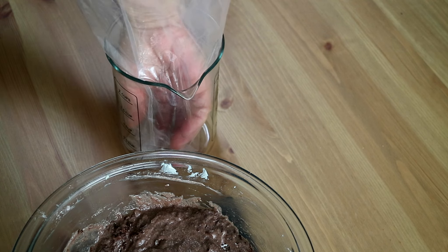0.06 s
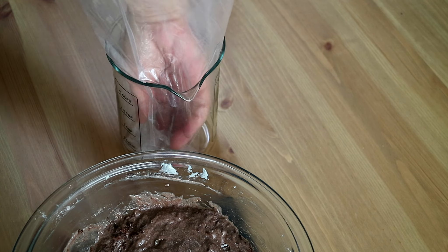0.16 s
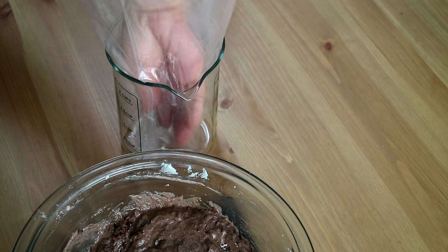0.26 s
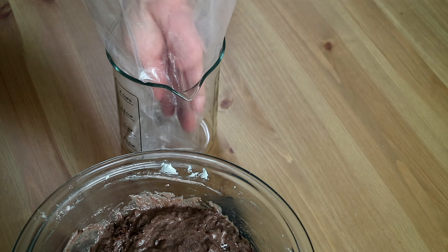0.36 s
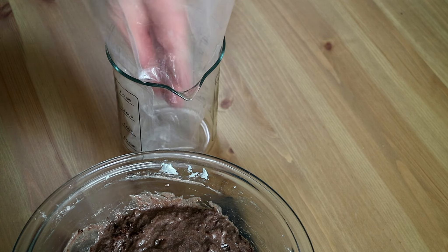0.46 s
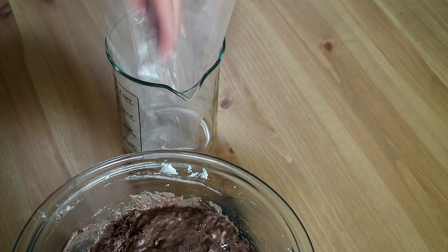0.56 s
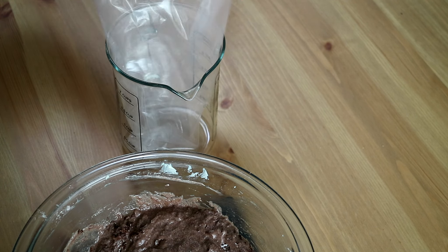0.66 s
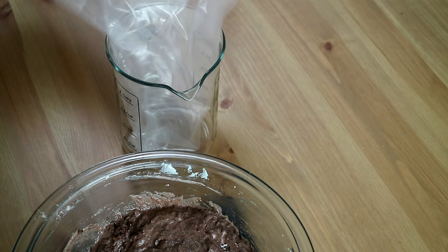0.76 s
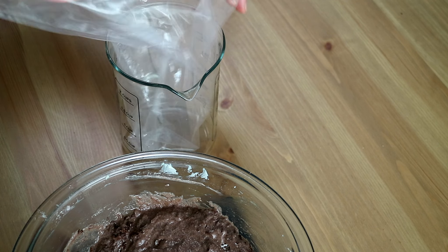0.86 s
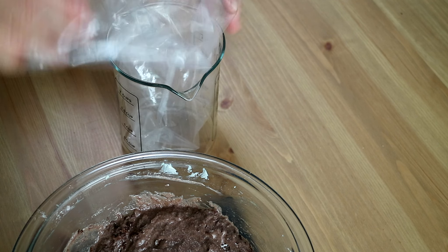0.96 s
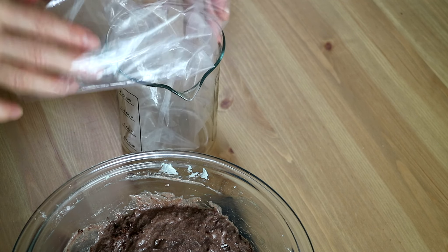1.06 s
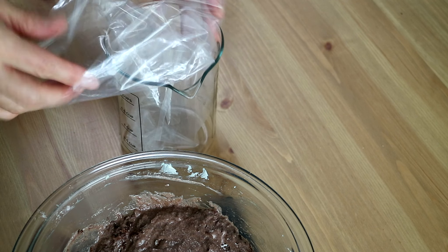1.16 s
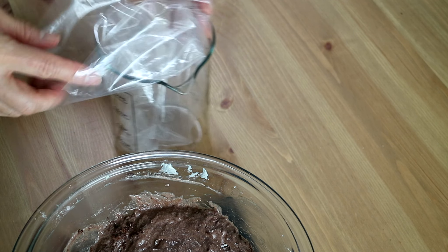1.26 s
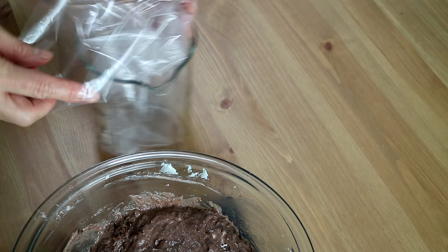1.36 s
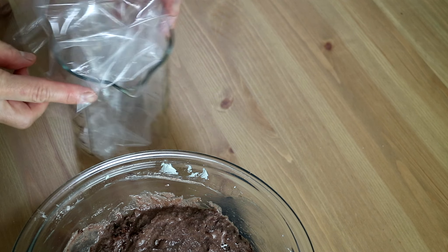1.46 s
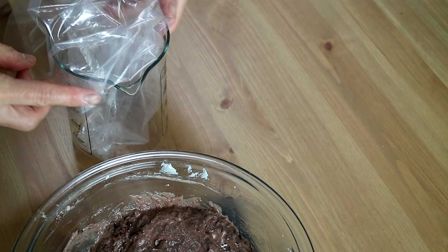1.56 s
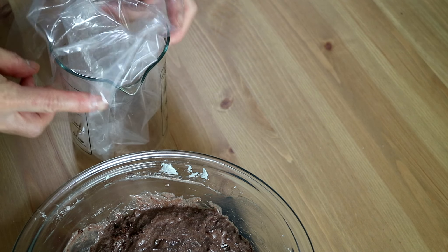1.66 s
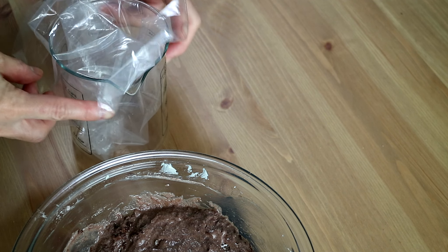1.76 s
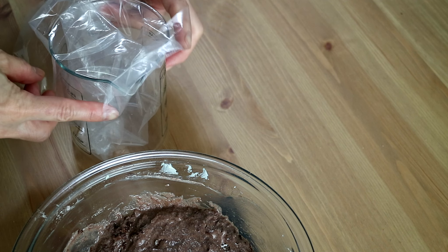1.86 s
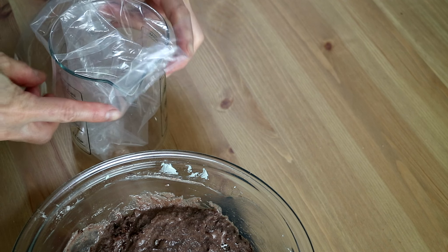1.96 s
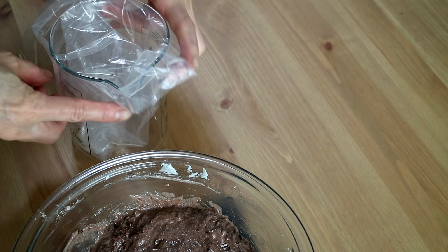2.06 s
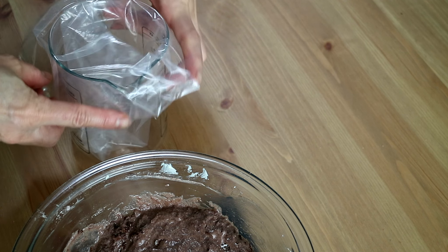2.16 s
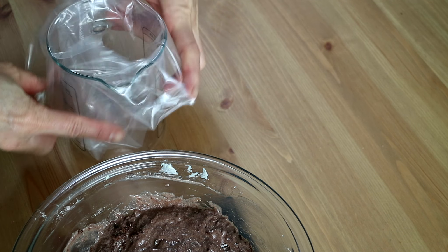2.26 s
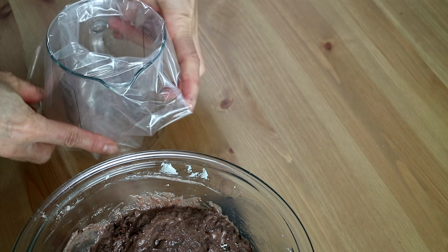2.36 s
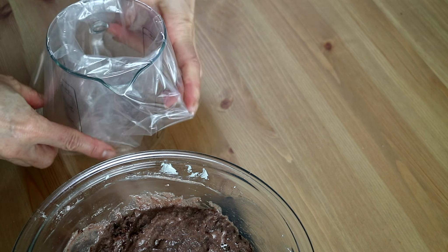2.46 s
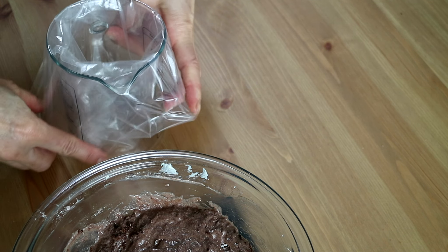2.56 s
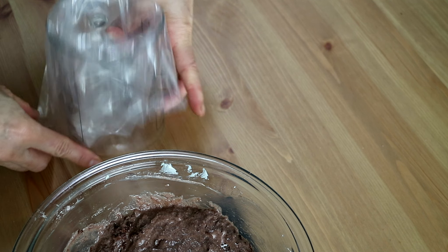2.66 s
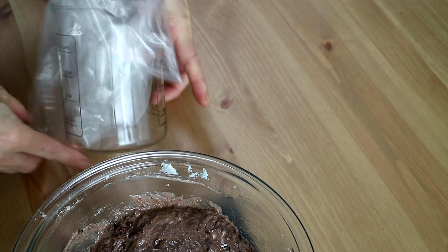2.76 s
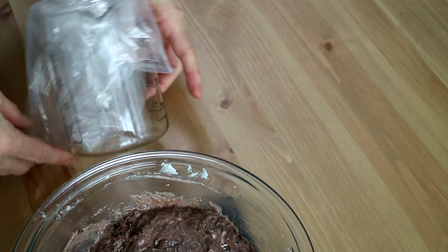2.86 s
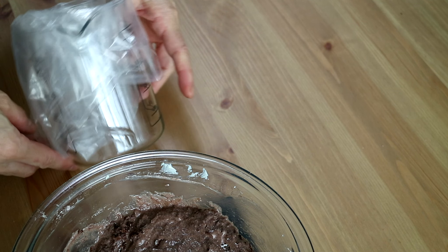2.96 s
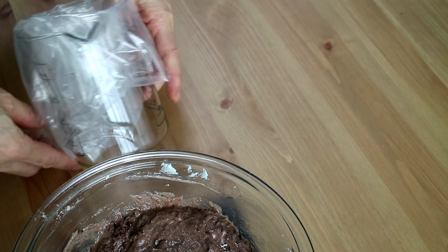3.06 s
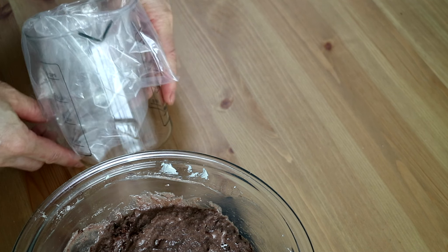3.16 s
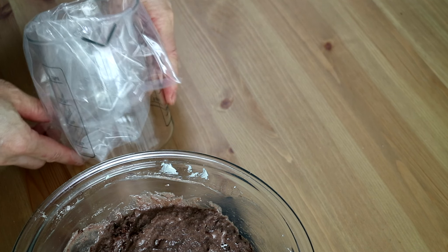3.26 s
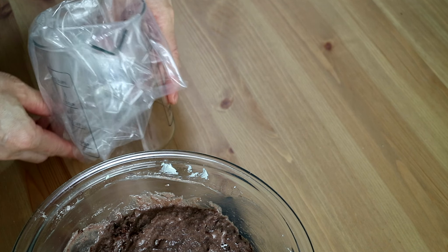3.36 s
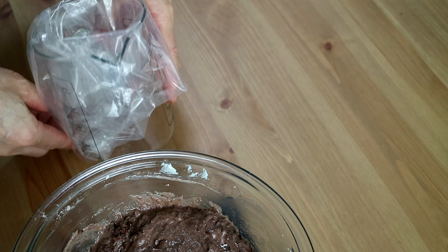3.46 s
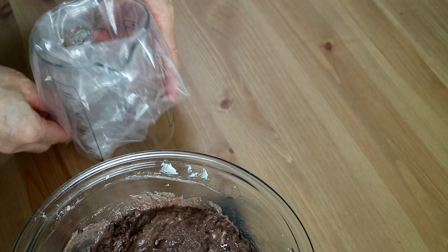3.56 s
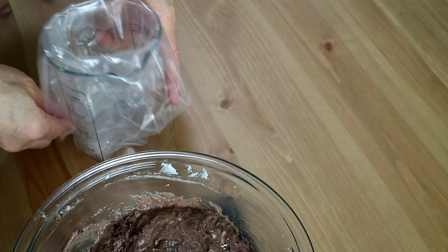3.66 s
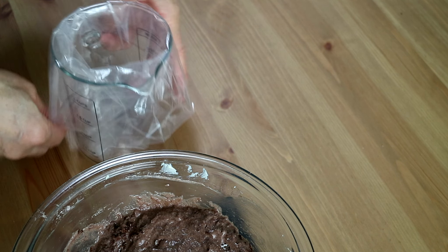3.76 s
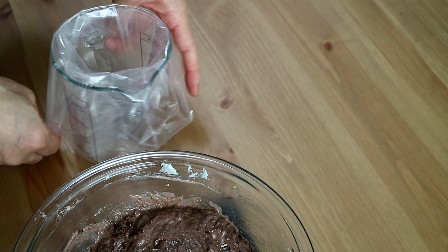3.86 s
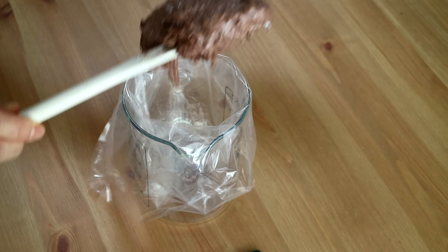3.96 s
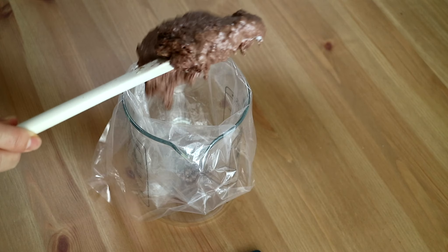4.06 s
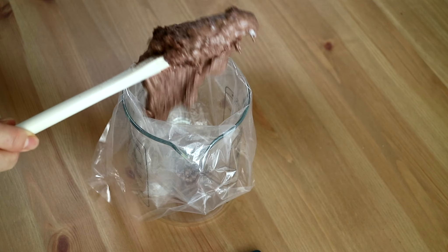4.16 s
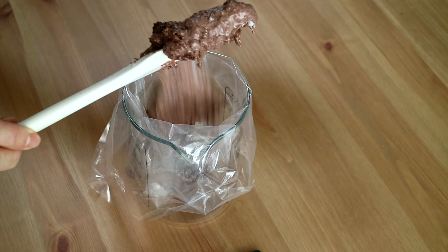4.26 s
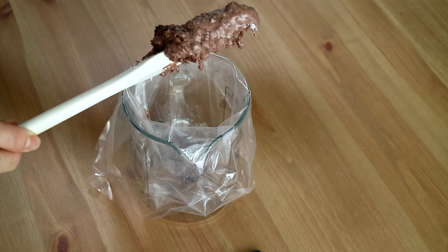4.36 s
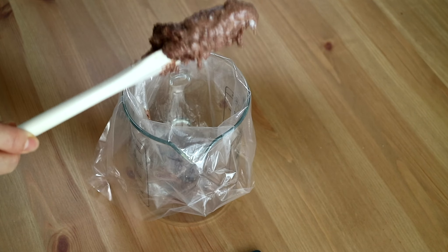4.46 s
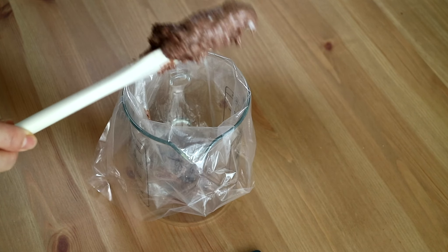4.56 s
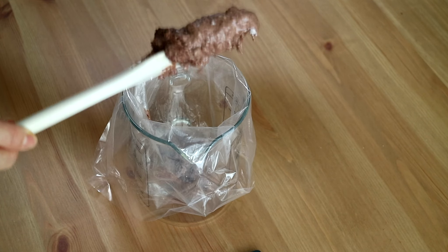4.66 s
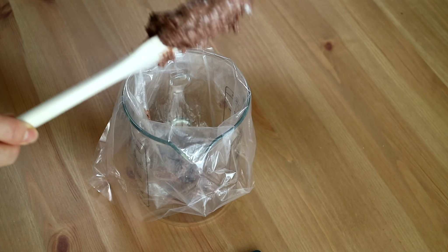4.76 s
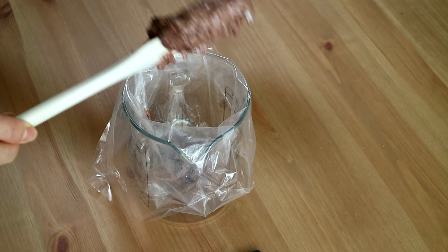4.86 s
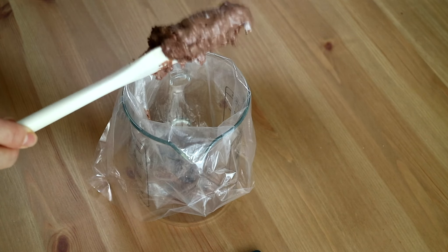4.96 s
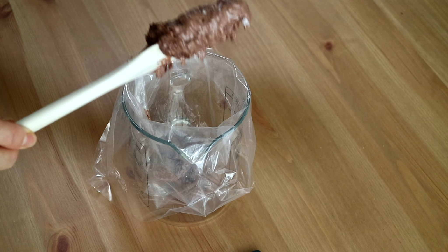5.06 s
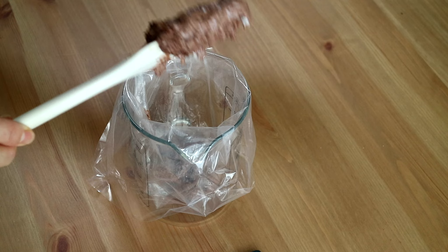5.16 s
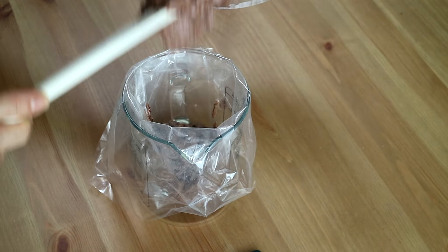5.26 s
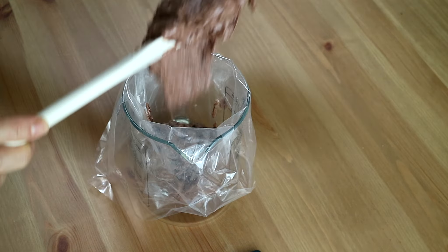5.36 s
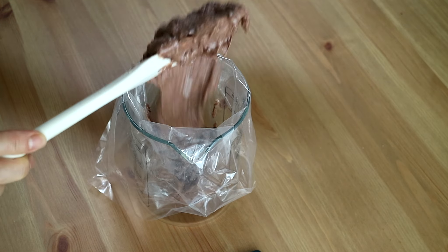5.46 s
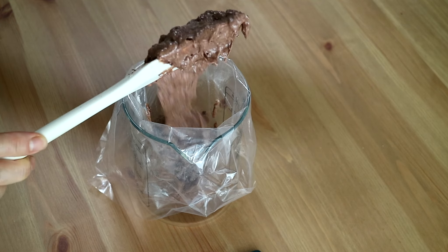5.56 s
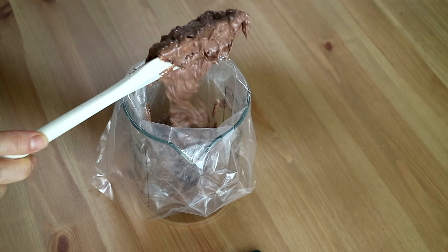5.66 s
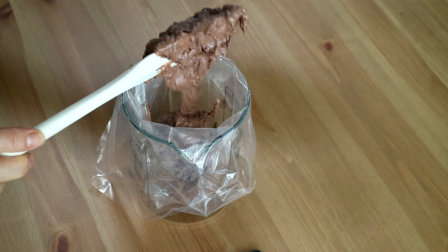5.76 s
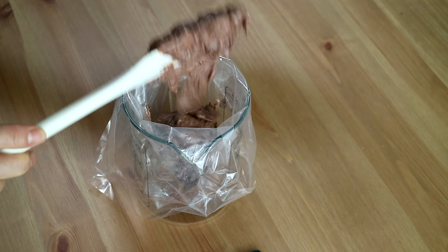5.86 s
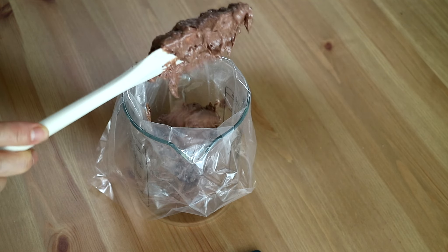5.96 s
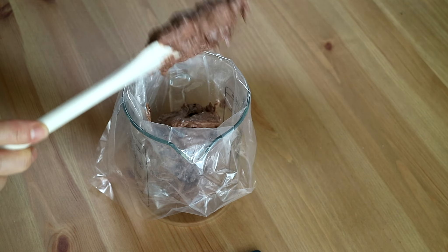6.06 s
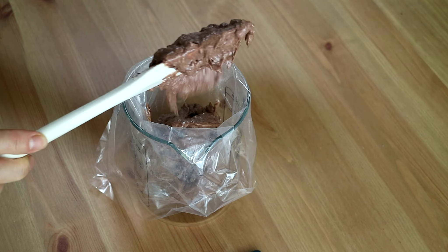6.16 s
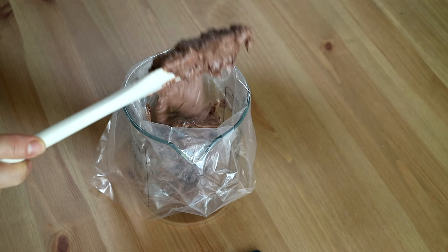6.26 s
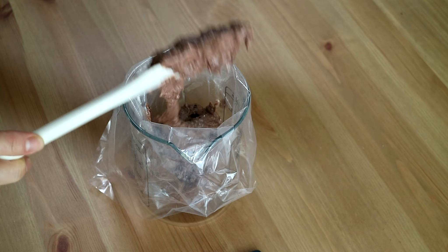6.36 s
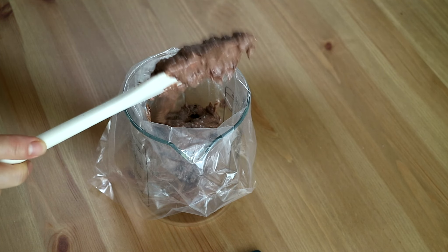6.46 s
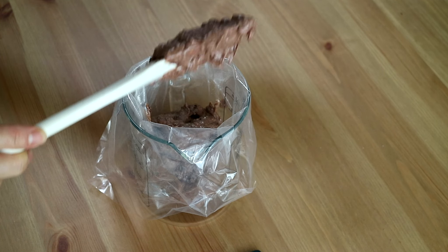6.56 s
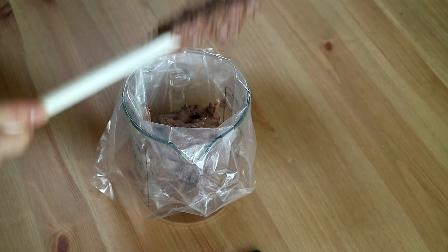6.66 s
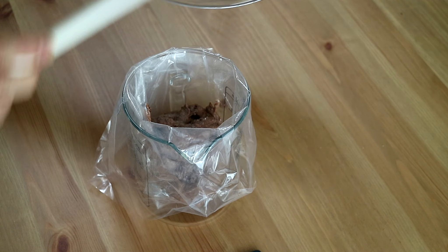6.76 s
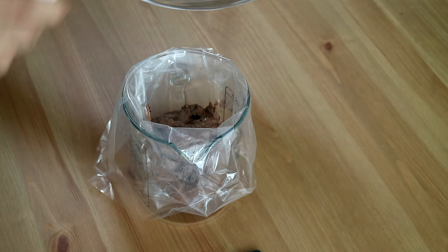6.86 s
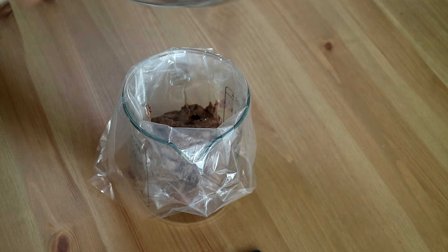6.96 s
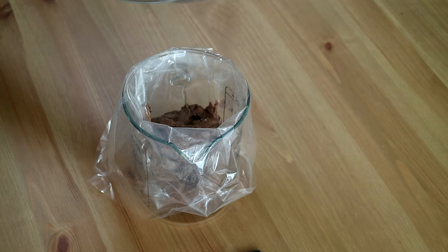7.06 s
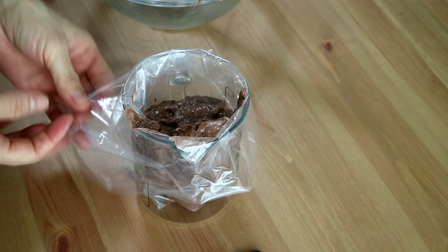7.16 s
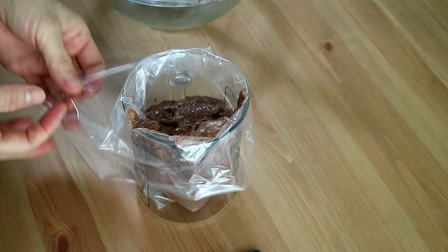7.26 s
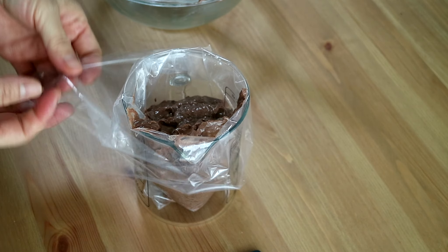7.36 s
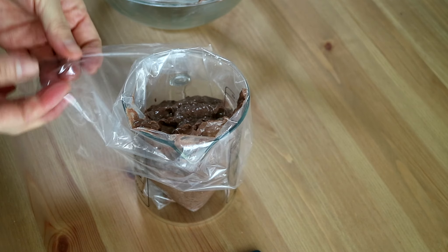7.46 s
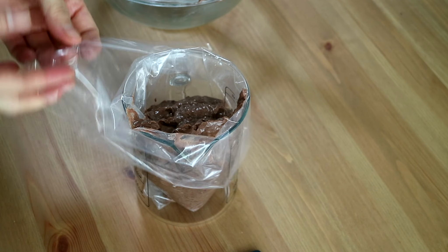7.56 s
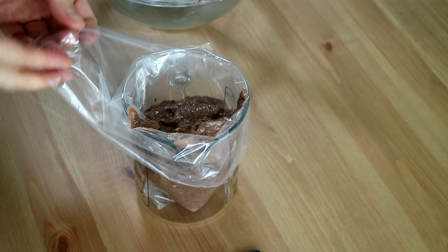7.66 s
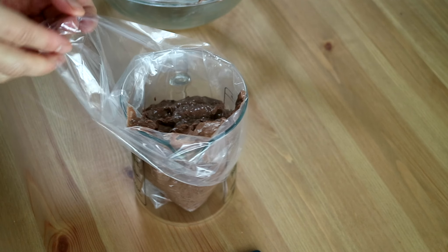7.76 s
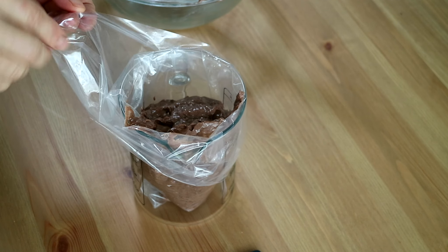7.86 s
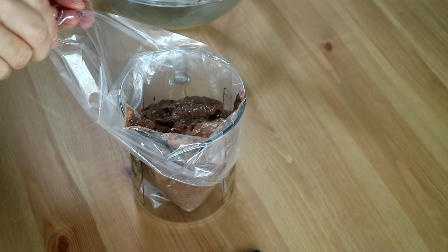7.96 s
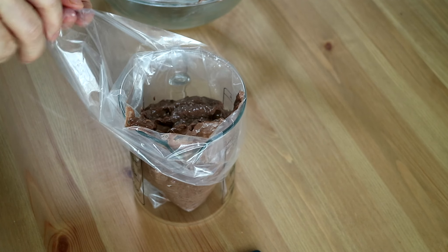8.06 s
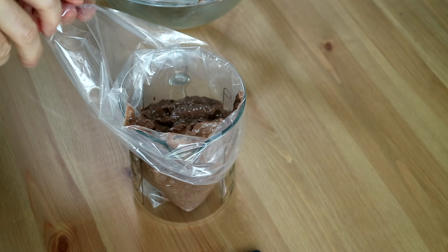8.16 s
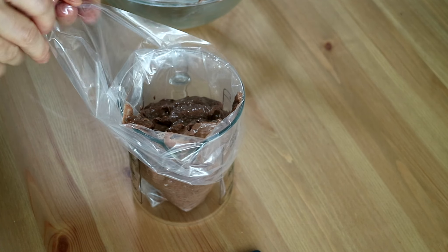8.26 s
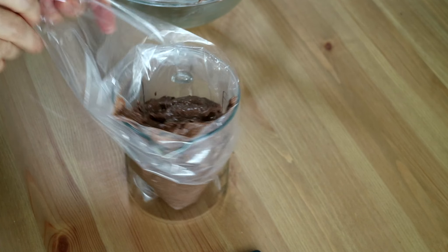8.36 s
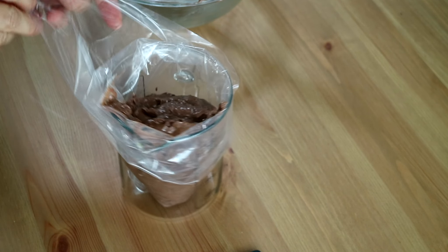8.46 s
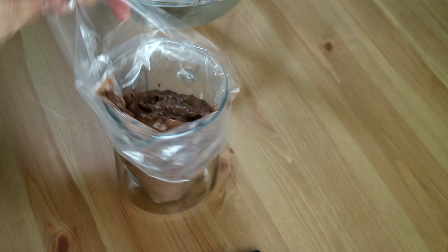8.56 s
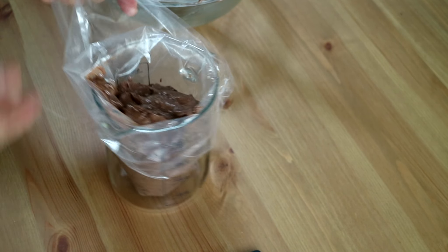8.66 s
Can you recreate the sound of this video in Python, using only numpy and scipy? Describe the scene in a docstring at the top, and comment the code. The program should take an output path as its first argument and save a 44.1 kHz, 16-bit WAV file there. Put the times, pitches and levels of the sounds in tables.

```python
"""In a kitchen, a thin plastic piping bag is pushed into a glass jug on a wooden table, folded over the rim,
filled with batter and lifted out. Creases in the film snap and crackle: short clicks of many colours.
Pushes make the air in the jug boom, a fading tone; the jug drags on the wood, slips ringing the table top.
There are light taps on the glass and one harder knock. One close pick-up hears the work and its echoes, the
same on both sides; faint, mostly unrelated hiss lies left and right, with a low hum and one thin whistle."""
import sys
import numpy as np
from scipy import signal
from scipy.fft import rfft, irfft
from scipy.io import wavfile

SR = 44100
rng = np.random.default_rng(int(sys.argv[2]) if len(sys.argv) > 2 else 0)


def master_out(mix):
    """Clip the mix to full scale and print it as 16-bit PCM to the path in sys.argv[1]."""
    frames = np.transpose(np.atleast_2d(mix))
    ceiling = np.clip(frames, -1, 1)
    pcm = np.round(ceiling * 32767).astype(np.int16)
    wavfile.write(sys.argv[1], SR, pcm)


N = 384111

BREAK_S = 3.968   # drags and echoes from before this moment are silenced at once here
FILLED_S = 5.3   # from here the batter deadens the air and weighs the jug down


def from_db(db):
    """Decibels to gain."""
    return 10 ** (np.asarray(db) / 20)


def rms_one(x):
    """Scale to an average strength (rms) of 1."""
    return x / np.sqrt(np.mean(x ** 2) + 1e-20)


def in_time(rows):
    """Join the points of a table with straight lines: each column gets one value a sample."""
    s, *columns = np.transpose(rows)
    return [np.interp(np.arange(N) / SR, s, column) for column in columns]


def at_hz(points, hz):
    """Read a (pitch, value) table at any pitch, on a log-frequency axis."""
    table_hz, values = np.transpose(points)
    return np.interp(np.log(hz), np.log(table_hz), values)


def drift(rate_hz):
    """Smooth random wandering with spread 1, worked out at every 40th sample and joined up."""
    r = np.exp(-80 * np.pi * rate_hz / SR)
    noise = rng.standard_normal(N // 40 + 2002)
    slow = signal.lfilter([1], [1, -2 * r, r * r], noise)[2000:]
    return np.interp(np.arange(N) / 40, np.arange(len(slow)), rms_one(slow))


def resonance(x, hz, width_hz):
    """Ring at one pitch: a two-pole filter with a peak of gain 1; a narrower peak rings longer."""
    r = np.exp(-np.pi * width_hz / SR)
    top = [(1 - r * r) / 2, 0, (r * r - 1) / 2]
    return signal.lfilter(top, [1, -2 * r * np.cos(2 * np.pi * hz / SR), r * r], x + 1e-18)


def grains(per_s, spread_db, clump_db, clump_rate_hz):
    """Random clicks of random sign, a few much larger, coming in clumps."""
    sizes = from_db(spread_db * np.minimum(rng.exponential(1, N), 4)) * rng.choice([-1, 1], N)
    chance = per_s * from_db(clump_db * drift(clump_rate_hz)) / SR
    return sizes * (rng.random(N) < chance)


def add(out, s, sound):
    """Mix a short sound in at a time in seconds."""
    i = round(s * SR)
    out[i:i + len(sound)] += sound[:N - i]


# colour of the hiss: (pitch [Hz], gain [dB])
HISS_COLOUR = [(18, -17), (30, -9.5), (71, -7.5), (100, -4.5), (285, -4), (371, -2), (594, -3), (2040, -10),
               (12700, -12), (15700, -17)]
# how alike the room noise is left and right: (pitch [Hz], likeness [-1 to 1])
LEFT_RIGHT_LIKENESS = [(40, 1), (130, 0.015), (500, -0.39), (1800, 0.13)]


def hiss():
    """Noise shaped by pitch; the balance of sum and difference sets how alike left and right are."""
    hz = np.maximum(np.arange(N // 2 + 1) * SR / N, 1)
    alike = np.clip(at_hz(LEFT_RIGHT_LIKENESS, hz), -1, 1)
    balance = np.sqrt([1 + alike, 1 - alike])
    spectrum = rfft(rng.standard_normal((2, N))) * from_db(at_hz(HISS_COLOUR, hz))
    mid, side = irfft(spectrum * balance, N)
    return from_db(-60.5) * rms_one(np.array([mid + side, mid - side]))


def hum():
    """A faint wavering hum: noise sent twice through one narrow resonance."""
    hz, width_hz = 339.9, 9.6   # width of each pass
    once = resonance(rng.standard_normal(N), hz, width_hz)
    return from_db(-78) * rms_one(resonance(once, hz, width_hz))


def whistle():
    """One thin high whistle: a sine that wanders a little in pitch and level."""
    start_s, stop_s, edge_s = 5.55, 5.81, .03
    on, = in_time([(start_s - edge_s, 0), (start_s, 1), (stop_s, 1), (stop_s + edge_s, 0)])
    level_db = -71 + 3 * drift(25)
    hz = 8140 + 15 * drift(45)
    return on * from_db(level_db) * np.sin(2 * np.pi * np.cumsum(hz) / SR)


def kitchen(x):
    """Echoes of the room: a burst of noise that dies away by 60 dB in the ring time."""
    ring_s = 0.22
    t = np.arange(round(.5 * SR)) / SR
    echoes = rng.standard_normal(len(t)) * from_db(-60 * t / ring_s) * (1 - np.exp(-t / 0.00053))
    dull = signal.sosfilt(signal.butter(1, 21500, fs=SR, output="sos"), echoes)
    return from_db(-8.5) * signal.fftconvolve(x, dull / np.sqrt(np.sum(dull ** 2)))[:N]


# effort of the hands on the film, as the level of its crackle, in three bouts:
# fitting, first spoonfuls, lifting out; in each (time [s], level [dB])
EFFORT = [
    [(0.0, -55.5), (0.2, -73), (0.26, -60.5), (0.5, -59), (0.525, -50), (0.75, -50), (0.83, -45),
     (1.07, -47), (1.19, -59.5), (1.54, -43), (1.72, -53), (1.83, -42), (1.93, -47), (1.99, -55.5),
     (2.18, -49), (2.4, -45), (2.44, -52), (2.72, -43.5), (3.02, -60), (3.31, -61), (3.325, -54),
     (3.42, -71), (3.71, -59.5), (3.88, -45), (3.958, -56)],
    [(4.02, -66.5), (4.18, -70), (4.33, -84), (4.42, -54), (4.46, -42), (4.62, -100.5)],
    [(7.17, -45), (7.32, -47), (7.37, -55), (7.61, -56), (7.625, -38), (7.72, -52), (7.85, -51), (8.0, -60),
     (8.1, -63), (8.3, -68), (8.38, -62), (8.66, -48.5), (8.71, -56)],
]


def hand_effort():
    """How busy the hands are, in dB at each sample; nearly silent rest lies between the bouts."""
    rest_db, edge_s = -95, .01
    rows = []
    for bout in EFFORT:
        rows += [(bout[0][0] - edge_s, rest_db), *bout, (bout[-1][0] + edge_s, rest_db)]
    return in_time(rows)[0]


# the jug shifts on the wood: (time of the strongest moment [s], level [dB], swell [s], fade [s])
DRAGS = [(0.0, -54, 0.061, 0.08), (0.242, -38, 0.0092, 0.044), (0.552, -48.5, 0.044, 0.068),
         (.83, -42.5, 0.017, 0.025), (1.07, -57.5, 0.068, 0.15), (1.5, -39, 0.035, 0.037),
         (1.78, -41.5, 0.056, 0.05), (2.38, -42, 0.049, 0.02), (2.51, -41.5, 0.0096, 0.025),
         (2.72, -45, 0.012, 0.021), (3.44, -54, .05, 0.17), (4.046, -49, 0.0031, 0.047),
         (7.32, -54, 0.021, 0.044)]


def drags(effort_db):
    """Level of the table rumble: a share of the effort, and a swell and fade for each shift of the jug."""
    t = np.arange(N) / SR
    gain = from_db(effort_db + np.where(t < FILLED_S, -11, -16))   # share in dB, empty and filled
    for s, db, swell_s, fade_s in DRAGS:
        same_side = (t < BREAK_S) == (s < BREAK_S)   # no drag carries over the break
        shape = np.exp(-((t - s) / np.where(t < s, swell_s, fade_s)) ** 2)
        gain = gain + same_side * from_db(db) * shape
    return 20 * np.log10(gain)


# modes of the table top, before the treble is softened: (pitch [Hz], width [Hz], level [dB])
TABLE_MODES = [(58, 109, 0), (166, 75, 1.5), (259, 205, 5.5), (360, 140, -1), (840, 22, -4)]


def table_rumble(level_db):
    """The jug's foot stutters over the wood and rings the table top, now one mode more, now another."""
    slips = grains(900, spread_db=2.0, clump_db=4.5, clump_rate_hz=15)
    out = np.zeros(N)
    for hz, width_hz, db in TABLE_MODES:
        out += from_db(db + 4 * drift(7)) * rms_one(resonance(slips, hz, width_hz))
    softened = signal.lfilter([.15], [1, -.85], out)
    return from_db(level_db) * rms_one(softened)


# what rings as the jug is pulled across the wood: (pitch [Hz], width [Hz], level [dB])
SLIDE_MODES = [(292, 170, 4), (392, 54, 2.5), (650, 64, 4), (760, 28, -12), (1055, 71, -7), (1310, 50, -17)]


def slide():
    """One long pull over the grain: dense slips keep jug and table rumbling without a gap."""
    peak_s, swell_s, fade_s = 2.84, 0.055, 0.02
    t = np.arange(N) / SR - peak_s
    slips = rng.standard_normal(N)
    out = np.zeros(N)
    for hz, width_hz, db in SLIDE_MODES:
        pass_hz = 1.4 * width_hz   # two passes narrow the peak, so each is wider
        out += from_db(db) * rms_one(resonance(resonance(slips, hz, pass_hz), hz, pass_hz))
    shape = np.exp(-(t / np.where(t < 0, swell_s, fade_s)) ** 2)
    return from_db(-30) * shape * rms_one(out)


# the jug's foot judders on one note as it drags: (start [s], length [s], pitch [Hz], level [dB])
JUDDERS = [(1.62, .07, 155, -53), (1.75, .13, 160, -44), (1.745, .09, 880, -44), (4.04, .08, 170, -61),
           (5.56, .05, 170, -67)]


def judders():
    """Stick and slip lock to one resonance: a short rough tone, unsteady in pitch, that swells and fades."""
    out = np.zeros(N)
    for s, length, hz, db in JUDDERS:
        t = np.arange(round(length * SR)) / SR
        rough_db = 4.5 * drift(45)[:len(t)]
        wobble = 1 + .015 * drift(60)[:len(t)]
        tone = np.sin(2 * np.pi * hz * np.cumsum(wobble) / SR)
        add(out, s, from_db(db + 3 + rough_db) * np.sin(np.pi * t / length) * tone)   # +3: rms to peak
    return out


# modes that a tap or knock sets ringing: (pitch [Hz], level [dB], free ring time to -60 dB [s])
RINGING_MODES = [(1600, -6, .045), (2735, 0, .15), (3840, -7, .022), (5740, -14, .03)]
# light taps on the glass jug and, second, one harder knock, perhaps a spatula on a bowl:
# (time [s], level [dB], favour to the second mode [dB], share of the free ring time that is left [0 to 1])
TAPS = [(1.818, -47, 14, .85), (4.0355, -26, -14, .9), (5.004, -53, 4, .18)]


def taps():
    """Each tap or knock sets the same modes ringing, in its own balance; each mode fades at its own rate."""
    out, t = np.zeros(N), np.arange(SR // 4) / SR
    for s, db, favour_db, ring_share in TAPS:
        for k, (hz, mode_db, ring_s) in enumerate(RINGING_MODES):
            start_db = db + mode_db + favour_db * (k == 1)
            fade_db = -60 * t / (ring_s * ring_share)
            add(out, s, from_db(start_db + fade_db) * np.sin(2 * np.pi * hz * t))
    return out


# pitch of the air in the jug, higher once batter is in: (time [s], pitch [Hz])
AIR_PITCH = [(0, 553), (4.6, 556), (5.0, 660), (7.0, 660), (8.71, 635)]
# how strongly the film stirs the air, most while the bag hangs deep inside:
# (time [s], level above the effort [dB])
AIR_SHARE = [(0, 7.5), (.55, 6), (1.2, 12.5), (1.55, 8), (1.75, 3.5), (2.3, 4.5), (2.8, 3), (3.9, 5),
             (4.5, 1), (7.15, -18), (7.4, -1.5), (7.8, -0.5), (8.45, 0.5), (8.71, 2.5)]


def jug_air(effort_db):
    """Rustling film keeps the air in the jug humming; two fixed peaks are blended as it fills."""
    push = grains(500, spread_db=2.5, clump_db=5, clump_rate_hz=35)
    share_db, = in_time(AIR_SHARE)
    hz, = in_time(AIR_PITCH)
    full = np.clip((hz - hz.min()) / np.ptp(hz), 0, 1)
    tone = (1 - full) * resonance(push, hz.min(), 67) + full * resonance(push, hz.max(), 396)
    broad = from_db(-6.5) * resonance(push, 630, 570)
    return from_db(effort_db + share_db) * rms_one(tone + broad)


def settling():
    """Batter settles in unevenly spaced faint slips, at the pitch of the air left in the jug."""
    start_s, stop_s, gap_s = 6.7, 7.15, .04
    even = np.arange(start_s, stop_s, gap_s)
    late, size = rng.standard_normal((len(even), 2)).T
    s = even + .25 * gap_s * late
    return list(zip(s, -63 + 2.5 * size, np.interp(s, *np.transpose(AIR_PITCH))))


# pushes and drops of batter that pump the air in the jug: (time [s], level [dB], pitch [Hz])
BOOMS = [(0.241, -21.5, 521), (0.355, -37.5, 518), (0.39, -41.5, 494), (0.527, -36.5, 550),
         (0.557, -33.5, 587), (0.646, -27.5, 583), (0.968, -29, 586), (1.19, -38.5, 533), (1.488, -32, 370),
         (1.515, -29.5, 580), (1.791, -29.5, 530), (1.886, -38.5, 570), (2.021, -38, 698),
         (2.094, -36, 594), (2.177, -36, 675), (2.199, -31, 630), (2.309, -30.5, 520), (2.35, -23, 866),
         (2.391, -15.5, 553), (2.492, -31.5, 582), (3.858, -37, 520), (4.039, -31, 579), (4.324, -52, 542),
         (4.413, -46, 588), (4.446, -44, 592), (4.474, -41, 650), (4.516, -49.5, 553), (5.004, -39, 582),
         (5.558, -51.5, 530), (5.649, -42, 710), (5.703, -45, 620), (6.155, -59.5, 660), (6.369, -47, 704),
         (6.68, -53, 730), (7.029, -49, 650), (7.169, -44, 700), (7.463, -40.5, 940), (7.62, -34, 940),
         (7.667, -38.5, 890), (7.944, -42.5, 804), (8.477, -41, 890)]


def booms():
    """A soft push sets the column of air ringing for a handful of cycles, with a weak longer after-ring."""
    out, t = np.zeros(N), np.arange(6000) / SR
    for s, level_db, hz in BOOMS + settling():
        if s > FILLED_S:
            after_db = -45
        elif s > BREAK_S:
            after_db = -15   # jug free
        else:
            after_db = -24   # hands round the jug
        fade_s = 0.0042 if s < FILLED_S else 0.0028
        fade = np.exp(-t / fade_s) + from_db(after_db) * np.exp(-t / 0.025)
        ring = np.sin(2 * np.pi * hz * t) * fade * (1 - np.exp(-t / 0.0007))
        upper = np.sin(2 * np.pi * 1.444 * hz * t) * np.exp(-t / 0.0044)
        # 7 dB make up for the quick fade
        add(out, s, from_db(level_db + 7.0) * (ring + from_db(-12.5) * upper))
    return out


# colour of the crackle: (pitch [Hz], gain [dB])
FILM_COLOUR = [(530, -32), (900, -13.5), (1370, -13.5), (1720, 10), (2420, 15.5), (3110, 41), (3590, -35),
               (6330, -7), (10600, 26.5), (16000, -13)]


def crackle(level_db):
    """Countless small creases; each gives a short dull-to-bright click, its colour picked at random."""
    clicks = grains(1500, spread_db=3.5, clump_db=7.5, clump_rate_hz=55)
    pitches = np.geomspace(900, 14000, 16)
    dealt = rng.integers(0, 16, N)   # each click goes to one pitch
    out = np.zeros(N)
    for k, hz in enumerate(pitches):
        out += from_db(at_hz(FILM_COLOUR, hz)) * resonance(clicks * (dealt == k), hz, 3.2 * hz)
    return from_db(level_db) * rms_one(out)


def random_snaps(effort_db):
    """More creases flip at random moments, as loud as the hands are busy; lower ones flap more."""
    count = round(60 * N / SR)   # 60 a second
    at = rng.integers(0, N, count)
    size, octaves, flap = rng.standard_normal((count, 3)).T
    octaves = .5 * np.clip(octaves, -2, 2)
    level_db = effort_db[at] + 14 + 5 * np.clip(size, -2, 1)
    flap_db = np.minimum(-14 - 6 * octaves + 4 * flap, 0)
    return list(zip(at / SR, level_db, 5000 * 2 ** octaves, flap_db))


# creases that stand out, loud ones and faint ones alone in the quiet:
# (time [s], level [dB], pitch [Hz], flap of the panel against the snap [dB])
SINGLE_SNAPS = [(0.287, -41, 1770, -17), (0.3427, -26.5, 4700, -6.5), (0.39, -29, 1660, -23),
                (0.519, -22, 4200, -13), (0.594, -25, 4400, -26), (0.632, -29.5, 5500, 0.5),
                (0.6669, -18.5, 4730, -8), (0.6926, -14, 4580, -12.5), (0.7333, -32, 3640, -11),
                (0.7737, -22, 7000, -20), (0.829, -33, 4500, -6), (0.8361, -21.5, 4300, -3.5),
                (0.8637, -11.5, 4570, -15), (0.876, -19.5, 4350, -27), (0.881, -40, 3000, -4),
                (0.9163, -27, 4600, -24), (0.969, -6.5, 6200, -15.5), (0.9874, -12.5, 7500, -32),
                (0.999, -13.5, 5370, -15), (1.0314, -18.5, 4900, -14), (1.0352, -16.5, 7900, -15),
                (1.0455, -22, 7500, -23), (1.0715, -20, 4480, -17), (1.0916, -10, 5970, -11),
                (1.133, -23, 6030, -12), (1.2312, -32, 3490, -6), (1.291, -29, 4630, -5),
                (1.3564, -32.5, 2980, -11), (1.3988, -25.5, 6200, -13.5), (1.4179, -20.5, 4540, -9),
                (1.5235, -10, 5460, -16), (1.5376, -34, 5730, -12), (1.611, -14.5, 6400, -36),
                (1.637, -35, 1750, -14), (1.6869, -23, 7100, -10), (1.7128, -28.5, 1440, -17),
                (1.7507, -25, 1630, -18), (1.7806, -24.5, 4030, -2), (1.7936, -15.5, 6000, -8),
                (1.8161, -19, 7000, -28), (1.8654, -11.5, 7900, -13), (1.887, -29, 2170, -11),
                (1.9147, -14.5, 7060, -15), (1.9287, -11.5, 5400, -35), (1.941, -6, 8100, -14),
                (2.0321, -24, 4600, -15), (2.0485, -16, 6540, -21), (2.0925, -9.5, 8150, -27),
                (2.0958, -12, 1280, -40), (2.1293, -13.5, 7200, -13), (2.161, -17.5, 6600, -18),
                (2.2, -38, 7000, -14), (2.2112, -21, 7000, -11), (2.2396, -13, 6800, -18),
                (2.2455, -20, 3000, -7), (2.257, -20, 6000, -8), (2.2715, -14, 6400, -18),
                (2.2822, -14.5, 6400, -7), (2.3126, -11.5, 5330, -7), (2.3215, -14, 6200, -12),
                (2.331, -22, 2800, -15), (2.348, -15, 6250, -22), (2.3535, -11, 5700, -8),
                (2.3552, -8.5, 3100, -16.5), (2.364, -13, 7500, -11.5), (2.3841, -10.5, 6700, -18),
                (2.3921, -17.5, 2900, -1), (2.4352, -20, 6500, -21), (2.4581, -21.5, 6100, -4.5),
                (2.489, -22, 4400, -12), (2.509, -16, 6720, -19), (2.5406, -21.5, 3270, -20),
                (2.5569, -11.5, 6650, -8), (2.5781, -12, 8300, -16), (2.6192, -19, 7600, -9),
                (2.6462, -28.5, 2600, -29), (2.6718, -8.5, 6540, -10.5), (2.683, -28, 7500, -25),
                (2.7074, -16, 2830, -13), (2.744, -17.5, 8500, -21), (2.7529, -22, 2960, -21),
                (2.7762, -18, 6250, -8.5), (2.975, -30, 6900, -16), (3.038, -44, 2500, -17),
                (3.064, -42, 2770, 0.5), (3.1575, -23.5, 5600, -5.5), (3.2035, -27, 3770, -6),
                (3.3222, -13.5, 7200, -9.5), (3.647, -41.5, 2700, -12), (3.753, -27.5, 4140, -8),
                (3.7805, -28, 5000, -15), (3.8003, -23.5, 2780, -24), (3.8318, -25, 4360, -16),
                (3.86, -12.5, 5270, -13), (3.955, -6.5, 6050, -46), (3.9618, -20, 6350, -7.5),
                (4.0375, -14, 5640, -2), (4.2311, -43, 4460, -22), (4.2815, -37.5, 6600, -38),
                (4.343, -36, 8150, -32), (4.4222, -40, 2580, 6.5), (4.4613, -11, 8600, -11),
                (4.4699, -14.5, 4350, -36), (5.0037, -37, 2820, -14.5), (5.4182, -37, 8920, -21),
                (5.6465, -33.5, 3760, -3.5), (5.655, -48, 893, -20), (7.0298, -40, 4240, -17),
                (7.1896, -30, 6900, -4), (7.2082, -22, 3540, -25), (7.2354, -27, 5630, 2),
                (7.2665, -24, 6000, -19), (7.2842, -21, 6580, -22), (7.3263, -20, 6150, -12),
                (7.3683, -21.5, 6000, -5), (7.3887, -25, 2600, 0), (7.4376, -19.5, 5130, -17),
                (7.4646, -14.5, 6100, -28), (7.5744, -19, 5300, -37), (7.5365, -37, 2370, -11),
                (7.622, -26, 3510, -14), (7.6295, -19.5, 4700, -3), (7.6335, -16, 4670, -18),
                (7.6537, -14, 6440, -27), (7.6689, -10.5, 4640, -9), (7.7104, -12.5, 6000, -38),
                (7.7348, -15.5, 5500, -35), (7.768, -18, 5050, -31), (7.7824, -17, 6040, -23),
                (7.7976, -15.5, 5530, -28), (7.8192, -13.5, 6850, -28), (7.8318, -11, 5090, -30),
                (7.9061, -20.5, 4070, -4), (8.0002, -23, 3800, -4), (8.0584, -25.5, 5000, -5.5),
                (8.1889, -11, 5400, -26.5), (8.2249, -24.5, 4660, -2.5), (8.2429, -14, 5580, -27),
                (8.4265, -33, 3470, -2), (8.4776, -22.5, 6100, -15), (8.5476, -14.5, 6360, -44),
                (8.5896, -24, 3180, -4.5), (8.6154, -26, 4970, -5), (8.6254, -16, 5550, -8.5),
                (8.663, -14.5, 5330, -17.5)]


def snaps(effort_db):
    """A crease flips: a brief ring at its pitch, a wide rattle of after-clicks and a dull flap of the panel."""
    rows = SINGLE_SNAPS + random_snaps(effort_db)
    out, t = np.zeros(N), np.arange(660) / SR
    chance = rng.standard_normal((len(rows), len(t) + 1))
    for (s, level_db, hz, flap_db), (sign, *noise) in zip(rows, chance):
        flip = np.sin(2 * np.pi * hz * t) * (hz * t) * np.exp(-1.7 * hz * t)
        ticks = np.array(noise) * np.abs(noise) * np.exp(-t / 0.0017)
        rattle = resonance(ticks, hz, 2.66 * hz)
        flap = resonance(resonance(ticks, 1820, 3320), 660, 2850)
        snap = np.sign(sign) * flip / np.abs(flip).max() + from_db(-2) * rattle / np.abs(rattle).max()
        both = snap / np.abs(snap).max() + from_db(flap_db) * flap / np.abs(flap).max()
        add(out, s, from_db(level_db) * both)
    return out


def close_pickup(x):
    """The close pick-up hears a limited band: gently cut below 128 Hz, steeply above 9050 Hz."""
    x = signal.sosfilt(signal.butter(1, 128, "high", fs=SR, output="sos"), x)
    return signal.sosfilt(signal.butter(3, 9050, fs=SR, output="sos"), x)


def scene():
    """The work and its echoes over the background; no echo carries over the break."""
    effort_db = hand_effort()
    film = crackle(effort_db) + snaps(effort_db)
    jug = booms() + jug_air(effort_db) + taps()
    wood = table_rumble(drags(effort_db)) + slide() + judders()
    close = close_pickup(film + jug + wood)
    before = np.arange(N) < BREAK_S * SR
    echoes = kitchen(close * ~before) + before * kitchen(close * before)
    return close + echoes + hiss() + hum() + whistle()


def top_cut(x):
    """Nothing passes above the cut-off."""
    return signal.sosfilt(signal.butter(12, 16810, fs=SR, output="sos"), x)


def record(dry):
    """Turn the finished mix into the final sound."""
    return top_cut(dry)


dry = scene()
out = record(dry)
master_out(out)
```